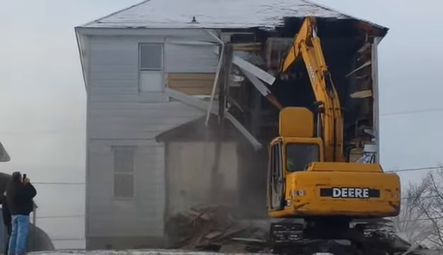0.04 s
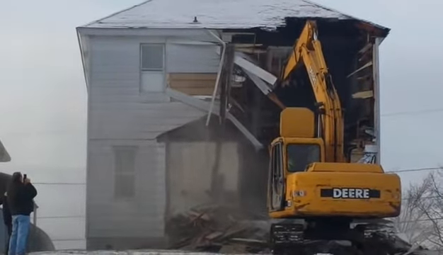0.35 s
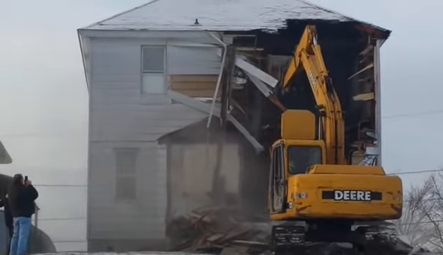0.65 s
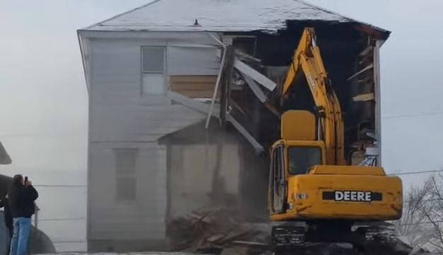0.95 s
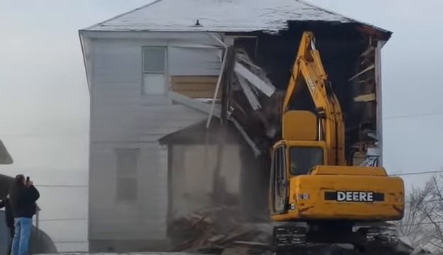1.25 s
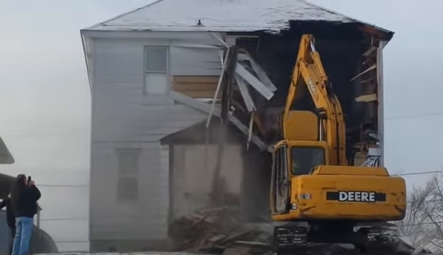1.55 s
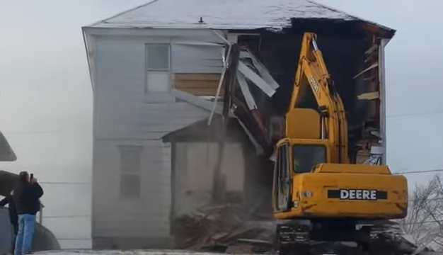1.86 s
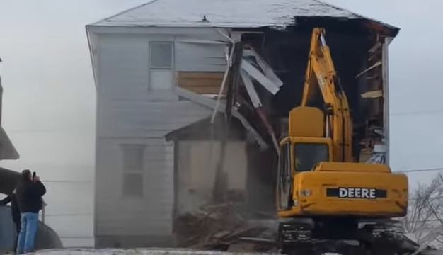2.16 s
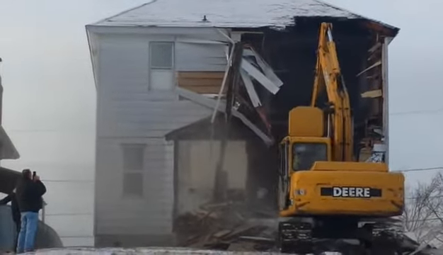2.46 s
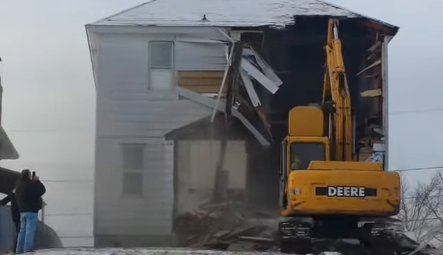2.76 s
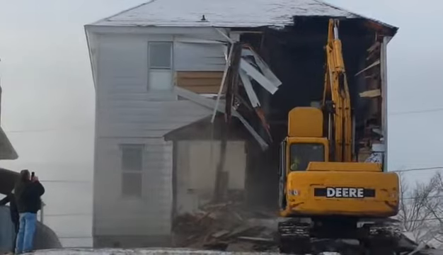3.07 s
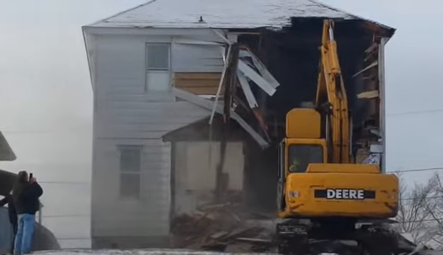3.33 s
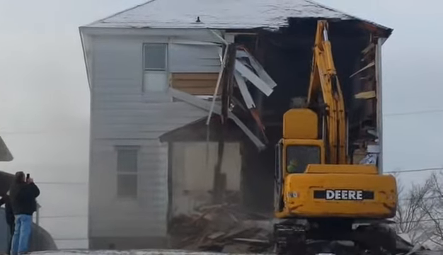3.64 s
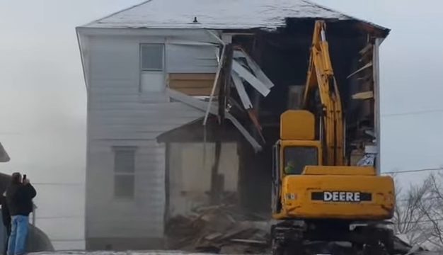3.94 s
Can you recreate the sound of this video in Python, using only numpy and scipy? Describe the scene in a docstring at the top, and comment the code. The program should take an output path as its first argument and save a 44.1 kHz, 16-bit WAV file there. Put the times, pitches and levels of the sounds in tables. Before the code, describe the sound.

Wooden boards crack and splinter from the start as an excavator tears at a house across a yard, with hollow beam thuds near 0.1 and 1 second. Debris crunches in bursts until about 2.4 seconds, with brief scrapes near 0.9 and 2.3. The diesel engine swells around 1 second, dips slightly in pitch and drones on with clatter and a thin whine. More rubble falls near 3.8 seconds.

```python
"""Across a yard, an excavator pulls down a wooden house.
Boards fracture fibre by fibre, heavy beams ring in their modes, and debris tumbles and scrapes down.
The diesel's periodic firing gives harmonic exhaust tones, clatter and a thin whine; its pitch sags
as it takes the load, then it drones on. Nearby buildings add a short reverberation to the timber."""
import sys
import numpy as np
from scipy import signal
from scipy.fft import rfft, irfft
from scipy.io import wavfile

SR = 44100
rng = np.random.default_rng(int(sys.argv[2]) if len(sys.argv) > 2 else 0)


def generate_wav(sig):
    """Save sig (samples, or channels by samples) to the path in sys.argv[1] as 16-bit PCM at SR."""
    pcm = np.round(np.clip(np.atleast_2d(sig).T, -1, 1) * 32767).astype(np.int16)
    wavfile.write(sys.argv[1], SR, pcm)


N = 176400
T = np.arange(N) / SR

# spectrum of a dull wooden knock: frequency_hz, relative_db
KNOCK_SPECTRUM = [(60, -24), (280, -8), (560, 3.5), (720, -2.5), (1800, 0), (2800, -10.5), (10000, -19.5)]
# spectrum of bright splintering: frequency_hz, relative_db
SNAP_SPECTRUM = [(200, -36), (2000, 4), (3600, 1.5), (6500, 0), (11500, -5.5)]
KNOCK_T60_S, SNAP_T60_S = 0.02, 0.024


def from_db(db):
    """Decibels to amplitude ratio."""
    return 10 ** (np.asarray(db) / 20)


def rms_one(x):
    """Normalisation to unit rms."""
    return x / np.sqrt(np.mean(x ** 2) + 1e-20)


def in_time(rows):
    """Linear interpolation of each column to every sample."""
    s, *columns = np.transpose(rows)
    return [np.interp(T, s, c) for c in columns]


def at_hz(points, hz, column=1):
    """Interpolation of a spectrum on a log-frequency axis."""
    rows = np.array(points)
    return np.interp(np.log(hz + 1), np.log(rows[:, 0]), rows[:, column])


def drift(corner_hz):
    """Low-passed noise: a slow random fluctuation of unit rms."""
    step = 40
    pole = np.exp(-2 * np.pi * corner_hz * step / SR)
    slow = signal.lfilter([1], [1, -2 * pole, pole * pole], rng.standard_normal(N // step + 2002))[2000:]
    return np.interp(np.arange(N) / step, np.arange(len(slow)), rms_one(slow))


def response(points, column=1, size=4096):
    """Minimum-phase impulse response of a spectrum, by folding its cepstrum."""
    log_gain = np.log(from_db(at_hz(points, np.arange(size // 2 + 1) * SR / size, column)))
    cepstrum = irfft(log_gain)
    cepstrum[1:size // 2] *= 2
    cepstrum[size // 2 + 1:] = 0
    return irfft(np.exp(rfft(cepstrum)))


def through(x, impulse):
    """Convolution, cut to the scene's length."""
    return signal.fftconvolve(np.atleast_2d(x), np.atleast_2d(impulse), axes=-1)[:, :N]


def colour(x, points, pitch=1):
    """Unit-energy filtering by a spectrum transposed by a pitch ratio."""
    impulse = response([(hz * pitch, db) for hz, db in points])
    return through(x, impulse / np.linalg.norm(impulse))


def stereo_noise(size):
    """Partial coherence: mid and side noise mix in a ratio that depends on frequency."""
    # likeness of left and right: frequency_hz, coherence
    coherence = [(60, 0.67), (700, 0.92), (1800, 0.54), (7000, 0.72)]
    mid, side = rfft(rng.standard_normal((2, size)))
    alike = at_hz(coherence, np.arange(len(mid)) * SR / size)
    return irfft(np.sqrt((1 + alike) / 2) * mid + np.sqrt((1 - alike) / 2) * side * [[1], [-1]], size)


def burst(t60_s, size=4096):
    """Dense damped modes of a splinter or a space: exponentially decaying noise of unit energy."""
    envelope = from_db(-60 * np.arange(size) / SR / t60_s)
    return stereo_noise(size) * envelope / np.linalg.norm(envelope)


def engine():
    """Periodic firing in a four-stroke diesel gives harmonics and amplitude-modulates its clatter."""
    # main exhaust tone, twice the firing rate: time_s, pitch_hz
    main_pitch = [(.85, 150.6), (1.15, 145.2), (1.9, 145.6), (2.55, 147.7), (2.76, 146.1), (3.0, 147.9),
                  (3.8, 146.9), (4, 145.4)]
    # strength of the main tone: time_s, level_db
    main_level = [(0, -33.5), (.35, -35), (.9, -26), (1.15, -18), (2.35, -16.5), (2.58, -20), (2.9, -19),
                  (3.25, -21.5), (3.65, -19.5), (3.92, -16.5)]
    # tone at the firing rate, against the main tone: time_s, relative_db
    firing_level = [(1.8, -5.5), (3.5, -9), (3.95, -5.5)]
    # third harmonic of the firing rate: time_s, level_db
    third_level = [(0, -44.5), (2.5, -39), (3.15, -30.5), (4, -32)]
    # weaker tones at full load, the highest a thin whine: cycle_rate_multiple, level_db
    overtones = [(5, -39), (10, -34), (11, -39.5), (15, -40.5), (28, -40), (49, -42), (54, -39.5),
                 (64, -41.5), (80, -45), (108, -37.5)]
    # strength of the clatter: time_s, level_db
    clatter_level = [(.4, -35.5), (1.1, -25), (4, -25.5)]
    # spectrum of the clatter: frequency_hz, relative_db
    clatter_spectrum = [(40, -4), (200, 6), (350, -1.5), (580, 1.5), (720, -7.5), (860, 2), (2100, -3),
                        (3500, -10.5), (10000, -20)]

    def tone(turns, db):
        return np.sqrt(2) * from_db(db) * np.sin(2 * np.pi * (turns + rng.random()))

    main_hz, = in_time(main_pitch)
    main_db, = in_time(main_level)
    firing_db, = in_time(firing_level)
    third_db, = in_time(third_level)
    clatter_db, = in_time(clatter_level)
    speed_jitter, waver_db, knock_depth = .001, 2, 0.15
    cycles = np.cumsum(main_hz * (1 + speed_jitter * drift(8))) / SR / 8
    firings = 4 * cycles
    load_db = clatter_db - clatter_db.max() + 0.36 * (third_db - third_db.max())
    tones = tone(firings, main_db + firing_db + drift(8) / 2)
    tones += tone(2 * firings, main_db + drift(8) / 2)
    tones += tone(3 * firings, third_db + 1.4 * drift(8))
    for multiple, db in overtones:
        tones += tone(multiple * cycles, db + load_db + waver_db * drift(8))
    one_cycle = rng.standard_normal(2400)  # part of the clatter repeats every cycle
    repeating = one_cycle[(cycles % 1 * len(one_cycle)).astype(int)]
    repeating = signal.sosfilt(signal.butter(2, [400, 1600], "band", fs=SR, output="sos"), repeating)
    knock = 1 + knock_depth * np.cos(2 * np.pi * firings)
    clatter = rms_one(knock * (stereo_noise(N) + from_db(-5) * repeating))
    return tones + from_db(clatter_db) * colour(clatter, clatter_spectrum)


def tear(length_s, t60_s, size=4096):
    """Cascading fracture: one strong snap, then a random run of fibres, each ringing briefly."""
    fibres_per_s, spread_db, first_snap_db = 1800, 1.5, 7
    t = np.arange(size) / SR
    breaking = (rng.random(size) < fibres_per_s / SR) & (t < length_s)
    snaps = breaking * from_db(spread_db * rng.standard_normal(size))
    snaps[0] = from_db(first_snap_db)
    snaps *= rng.choice([-1, 1], size)
    sound = through(snaps, burst(t60_s))
    return sound * np.sqrt(2 * (length_s + t60_s / 10) * SR / np.sum(sound ** 2))  # about unit rms


def boards():
    """Brittle fracture gives a dull knock and bright splintering, both higher in a thinner board."""
    # breaking boards: start_s, length_s, knock_db, snap_db, pitch_ratio
    breaks = [(.005, 0.0042, -18.5, -21, 0.93), (0.018, 0.011, -23.5, -23.5, 0.85),
              (0.093, 0.008, -21, -25, 0.71), (.103, 0.0037, -25, -18.5, 0.93),
              (.268, 0.0031, -22, -25, 0.97), (.304, 0.0041, -27.5, -17.5, 0.96),
              (.554, 0.01, -51, -24.5, 4.1), (.625, 0.013, -29.5, -22.5, 0.83),
              (0.815, 0.0027, -22, -18, 2.7), (.957, 0.0085, -46, -22.5, 2.9),
              (.974, 0.037, -35, -23, 1.14), (.983, .016, -19, -33, 1.05),
              (1.104, 0.0038, -24, -25.5, 0.88), (1.126, 0.0043, -26, -24, 0.6),
              (1.392, .0045, -22, -19, 1.1), (1.408, .02, -29, -19.5, 0.92), (1.558, 0.011, -42, -28, 4.6),
              (1.635, 0.0081, -29, -21.5, 3.7), (2.096, .045, -28, -31.5, 1.7)]
    out = np.zeros((2, N + SR))
    for start_s, length_s, knock_db, snap_db, pitch in breaks:
        knock = from_db(knock_db) * colour(tear(length_s, KNOCK_T60_S), KNOCK_SPECTRUM, pitch)
        snap = from_db(snap_db) * colour(tear(length_s, SNAP_T60_S), SNAP_SPECTRUM, pitch)
        start = int(start_s * SR)
        out[:, start:start + knock.shape[1]] += knock + snap
    return out[:, :N]


def grains(per_s, t60_s, pieces=10):
    """Shot noise: random impacts of uneven size excite pieces that each have their own ring."""
    spread_db, clump_db = 2.6, 1.3
    size_db = spread_db * np.minimum(rng.exponential(1, N), 4) + clump_db * drift(28)
    hits = from_db(size_db) * rng.choice([-1, 1], N) * (rng.random(N) < per_s / SR)
    piece = rng.integers(0, pieces, N)
    return rms_one(sum(through(hits * (piece == k), burst(t60_s)) for k in range(pieces)))


def debris():
    """Many small impacts superpose into the crunch of rubble and the crackle of splinters."""
    # falling debris: time_s, rubble_db, splinter_db
    fall = [(.05, -27, -31.5), (.12, -27, -25), (.26, -34, -35), (.52, -33.5, -37.5), (.66, -29.5, -33),
            (.94, -30, -31), (1.0, -23, -30), (1.07, -29, -33), (1.16, -24, -25), (1.36, -25, -34),
            (1.44, -27, -28.5), (1.53, -29.5, -30.5), (2.07, -32, -35), (2.14, -28, -23.5),
            (2.28, -23, -45), (2.42, -34.5, -36.5), (3.72, -39, -41.5), (3.85, -30, -29), (4, -31, -53)]
    rubble_db, splinter_db = in_time(fall)
    rubble = colour(grains(per_s=1200, t60_s=KNOCK_T60_S), KNOCK_SPECTRUM)
    splinters = colour(grains(per_s=600, t60_s=SNAP_T60_S), SNAP_SPECTRUM)
    return from_db(rubble_db) * rubble + from_db(splinter_db) * splinters


def beams(t60_s=0.085):
    """Damped free vibration: a heavy blow rings a beam's low modes as a hollow thud."""
    # beams giving way: start_s, level_db, pitch_hz
    thuds = [(.094, -16.5, 528), (.986, -15.5, 565)]
    # modes of a beam: frequency_ratio, relative_db
    modes = [(1, -3), (1.11, 2), (1.6, -2)]
    out = np.zeros(N)
    for start_s, db, hz in thuds:
        t = np.clip(T - start_s, 0, 2 * t60_s)
        ring = sum(from_db(mode_db) * np.sin(2 * np.pi * hz * ratio * t) for ratio, mode_db in modes)
        out += from_db(db) * ring * from_db(-60 * t / t60_s)
    return out


def slides(width_octaves=0.84):
    """Stick-slip friction: a sliding board's tiny slips swell and fade as a rasp around one pitch."""
    # scraping boards: middle_s, half_length_s, level_db, centre_hz
    scrapes = [(0.856, 0.045, -27.5, 1290), (2.258, 0.096, -24.5, 1400)]
    slips = grains(per_s=2400, t60_s=SNAP_T60_S, pieces=4)
    out = np.zeros((2, N))
    for middle_s, half_s, db, hz in scrapes:
        band = signal.butter(2, hz * 2 ** (width_octaves * np.array([-.5, .5])), "band", fs=SR, output="sos")
        swell = np.exp(-((T - middle_s) / half_s) ** 2 / 2)
        out += from_db(db) * swell * rms_one(signal.sosfilt(band, slips))
    return out


def yard(x, t60_s=0.17, tail_db=-9.5):
    """Reverberation: reflections from the buildings around add a thin, dull tail."""
    dull = signal.sosfilt(signal.butter(1, 5000, fs=SR, output="sos"), x)
    return x + from_db(tail_db) * through(dull.mean(axis=0), burst(t60_s, size=32768))


def scene():
    """Superposition of the engine and the reverberant sounds of the breaking house."""
    return engine() + yard(boards() + beams() + debris() + slides())


def record(dry):
    """Linear filtering: left and right each have a tone colour; treble falls steeply above 10 kHz."""
    # left and right tone colour: frequency_hz, left_db, right_db
    tone_colour = [(555, 0, -1.5), (2210, -2.5, -0.5), (2530, -10.5, -3), (3350, 4.5, -15.5),
                   (4160, 7, -10), (5080, -5.5, 1), (6360, -3, 4.5), (8200, -15.5, -3), (9960, -21, -3.5),
                   (10760, -30, -33.5)]
    cutoff_hz = 11400
    coloured = through(dry, np.array([response(tone_colour, column) for column in (1, 2)]))
    return signal.sosfilt(signal.ellip(10, .2, 80, cutoff_hz, fs=SR, output="sos"), coloured)


dry = scene()
out = record(dry)
generate_wav(out)
```